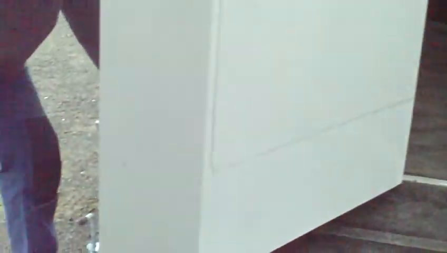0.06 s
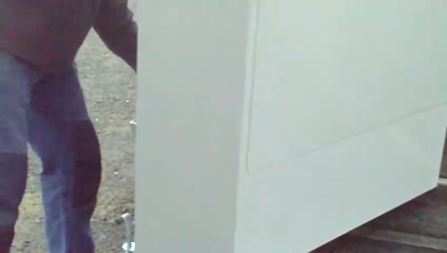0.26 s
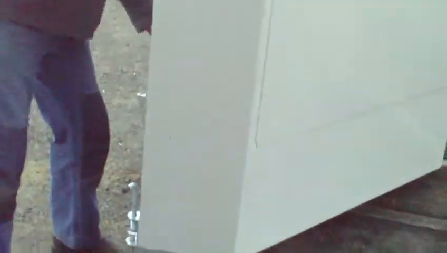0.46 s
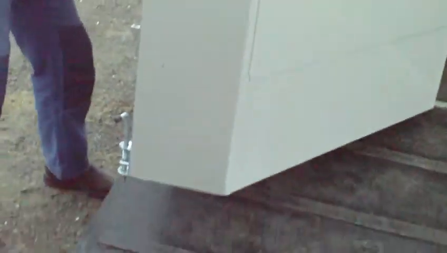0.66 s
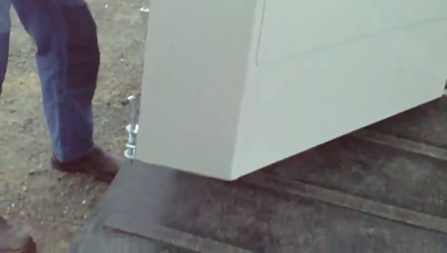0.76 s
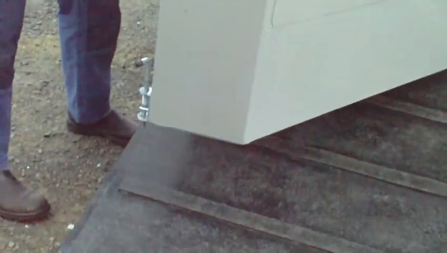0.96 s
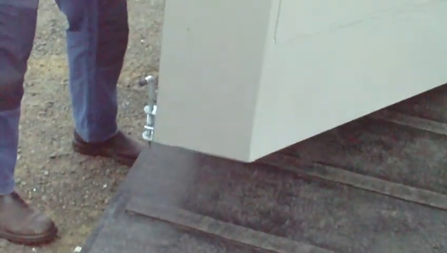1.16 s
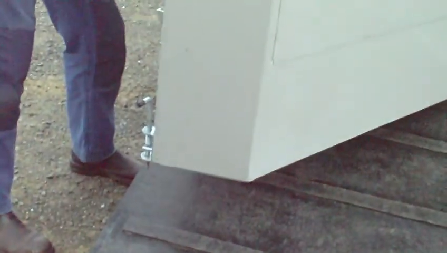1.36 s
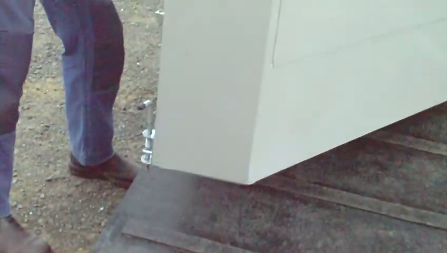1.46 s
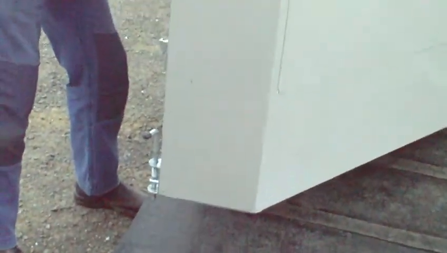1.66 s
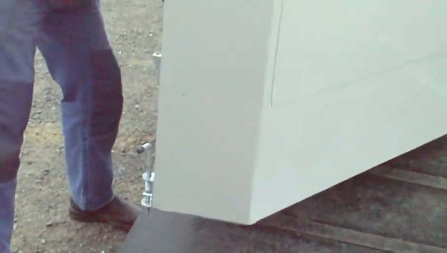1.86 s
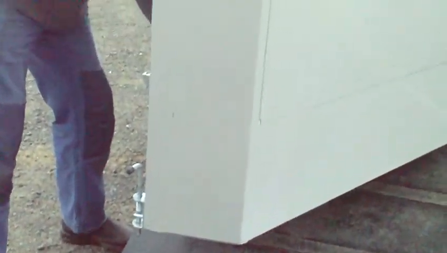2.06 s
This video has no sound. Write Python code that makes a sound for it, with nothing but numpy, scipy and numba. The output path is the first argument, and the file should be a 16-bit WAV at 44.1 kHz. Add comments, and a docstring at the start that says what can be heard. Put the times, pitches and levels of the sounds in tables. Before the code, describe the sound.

A trailer door's steel latch bangs open and rings, followed by softer knocks and scraping.

```python
"""A quiet yard, at a horse trailer. The door's steel latch snaps open, and the impact excites the modes
of the hollow door and the sheet-metal shell. The swinging door hums as it flexes, scrapes by stick-slip
friction, knocks a few times and brushes over the ramp. Grit crackles under boots and a small bird
whistles. Automatic gain control compresses the bang into a short plateau."""
import sys
import numpy as np
from scipy import signal
from scipy.fft import rfft, irfft
from scipy.io import wavfile
from numba import njit

SR = 44100
rng = np.random.default_rng(int(sys.argv[2]) if len(sys.argv) > 2 else 0)


def bounce(signal):
    """Save signal as a 16-bit WAV file at the path given by the first command-line argument."""
    frames = np.transpose(np.atleast_2d(signal))
    limited = np.clip(frames, -1, 1)
    pcm = np.round(limited * 32767).astype(np.int16)
    wavfile.write(sys.argv[1], SR, pcm)


N = 92610
TIME = np.arange(N) / SR
FREQS = np.maximum(np.arange(N // 2 + 1) * SR / N, 1)


def undb(db):
    """Amplitude ratio of a level in decibels."""
    return 10 ** (np.asarray(db) / 20)

def on_log(points):
    """Spectrum interpolated between (f, value) points on a logarithmic frequency axis."""
    hz, values = np.array(points).T
    return np.interp(np.log(FREQS), np.log(hz), values)

def filtered(source, gain):
    """Source-filter principle: spectrum times frequency response, normalised to rms 1."""
    out = irfft(rfft(source) * gain, N)
    return out / np.sqrt(np.mean(out ** 2))

def noise(gain):
    """Spectrally shaped Gaussian noise of rms 1."""
    return filtered(rng.standard_normal(N), gain)

def resonance(hz, width):
    """Band-pass response of a damped oscillator."""
    return 1 / (1 + 1j * hz / width * (FREQS / hz - hz / FREQS))

def fade(start, rise, t60):
    """Exponential damping with a linear onset."""
    age = np.maximum(TIME - start, 0)
    return np.minimum(age / max(rise, 1 / SR), 1) * np.exp(-np.log(1000) * age / t60)

def modes(table, start, rise, tilt_db, pivot_hz):
    """Modal superposition: damped sinusoids, tilted by tilt_db per octave about a pivot."""
    out = 0
    for hz, db, t60 in table:
        partial = np.sin(2 * np.pi * (hz * (TIME - start) + rng.random()))
        out += undb(db + tilt_db * np.log2(hz / pivot_hz)) * partial * fade(start, rise, t60)
    return out / 2

def slips(per_s, scatter_db):
    """Stick-slip as a Poisson process: tiny impulses of log-normal size."""
    occurs = rng.random(N) < per_s / SR
    return occurs * undb(scatter_db * rng.standard_normal(N)) * rng.choice([-1, 1], N)

# Decay of the trailer's shell: f/Hz, T60/s
SHELL_DECAY = [(150, 2.03), (350, 1.55), (750, 0.74), (2500, 0.68), (6000, 0.58), (10000, 0.52),
               (14000, 0.18)]

def shell(colour, start, rise, tilt_db, t60_scale, swell_cycles=0, patchy_db=2.5):
    """High modal density: sheet metal rings as uneven noise whose high bands die first."""
    grid = np.arange(0, SR / 2, 22)
    uneven = np.interp(FREQS, grid, rng.standard_normal(len(grid))) * np.minimum(FREQS / 2000, 1)
    octaves = np.log2(np.maximum(FREQS, 600))
    spectrum = rfft(noise(undb(on_log(colour) + tilt_db * octaves + patchy_db * uneven)))
    centres, t60s = np.array(SHELL_DECAY).T
    out = 0
    for hz, t60, weights in zip(centres, t60s, np.eye(len(centres))):
        band = irfft(spectrum * np.interp(np.log(FREQS), np.log(centres), weights), N)
        out += band * fade(start, rise + swell_cycles / hz, t60 * t60_scale)
    return out

# Modes of the door panel: f/Hz, relative level/dB, T60/s
PANEL_MODES = [(151.2, -30.5, 3.44), (286, -13, 1.7), (351, -7, 1.28), (439, -3, 0.72), (665.5, -0.5, 0.71),
               (802, 1.5, 0.72), (856, 2, 0.61), (933, 7, 0.54), (1300, -4.5, 0.62), (1702, -9, 0.6)]

def panel(start, rise, tilt_db=0, pivot_hz=990):
    """Free vibration: the struck door rings at its natural frequencies."""
    return modes(PANEL_MODES, start, rise, tilt_db, pivot_hz)

# Spectrum of a knock: f/Hz, relative level/dB
KNOCK_SPECTRUM = [(50, -73), (120, -36.5), (400, -21), (620, -8.5), (850, -3.5), (1090, -13.5), (1500, -7),
                  (2100, -1.5), (2430, -12.5), (3400, -6.5), (4100, -12.5), (7500, -12), (11000, -20.5),
                  (15000, -38)]
# Blows on the door: t/s, shell level/dB, rise/s, shell tilt/(dB/octave), panel gain/dB
DOOR_KNOCKS = [(-.01, -32.5, .003, -16.5, -66), (0.987, -28.5, 0.0045, -2.5, -36),
               (1.083, -23, 0.0023, -0.5, -57), (1.099, -21, 0.0011, -5, -30.5),
               (1.263, -33, 0.0014, -3.5, -44.5), (1.349, -33.5, 0.0026, -6, -41),
               (1.611, -47, 0.0044, -10, -71)]

def knocks():
    """Impulse excitation: light blows on the door ring both shell and panel."""
    out = 0
    for start, db, rise, tilt_db, panel_db in DOOR_KNOCKS:
        out += undb(db) * shell(KNOCK_SPECTRUM, start, rise, tilt_db, t60_scale=0.64)
        out += undb(panel_db) * panel(start, rise, tilt_db=2)
    return out

# Spectrum of the yard's background: f/Hz, relative level/dB
YARD_SPECTRUM = [(100, -17), (150, -7), (350, 8.5), (2500, 4.5), (4000, -3.5), (15000, -10)]

def yard(db=-52):
    """Stationary noise: a faint, broad hush."""
    return undb(db) * noise(undb(on_log(YARD_SPECTRUM)))

def grit(db=-57, hz=4000, end_s=1.37, fade_s=0.5):
    """Granular friction: grit crackles under boots until the door has swung out."""
    grains = filtered(slips(per_s=500, scatter_db=3.1), resonance(hz, 2 * hz) ** 2)
    return undb(db) * grains * np.clip((end_s - TIME) / fade_s, 0, 1)

# Ticks of the fittings: t/s, level/dB, centre f/Hz, T60/s
FITTING_TICKS = [(0.1301, -22, 3300, 0.01), (.672, -46.5, 6960, 0.16), (0.732, -44, 4170, 0.21),
                 (1.611, -38, 3820, 0.066)]

def ticks(bracket_hz=1750, bracket_db=-4, bracket_t60=0.012):
    """Brief contact has a broad spectrum: each fitting clicks and rings its bracket's damped mode."""
    out = 0
    for start, db, hz, t60 in FITTING_TICKS:
        click = noise(resonance(hz, 2 * hz) ** 2) * fade(start, 0.0001, t60)
        bracket = 2 * modes([(bracket_hz, bracket_db, bracket_t60)], start, 0.00004, 0, bracket_hz)
        out += undb(db) * (click + bracket)
    return out

# Modes of the steel latch: f/Hz, relative level/dB, T60/s
LATCH_MODES = [(1276, 6, 0.018), (2105, -1, 0.04), (2610, 7, 0.011), (4540, -2, 0.0526),
               (5410, -3.5, 0.052)]
# Slip, strike and later clank: t/s, level/dB, chatter time constant/s, tilt/(dB/octave), zing gain/dB
LATCH_IMPACTS = [(0.2023, -14.5, 0.016, 2.5, -4.5), (0.2124, 1, .004, -2, 0), (1.099, -15, 0.007, -8, -31)]

def latch(crack_db=-6, crack_hz=4500):
    """Steel-on-steel impact: chattering contact cracks, the latch rings, its clustered top modes zing."""
    out = 0
    for start, db, chatter, tilt_db, zing_db in LATCH_IMPACTS:
        rise = 0.28 * chatter
        crack = noise(resonance(crack_hz, 2 * crack_hz) ** 2) * fade(start, rise, np.log(1000) * chatter)
        zing = noise(resonance(hz=10200, width=1700) ** 2) * fade(start, rise=0.01, t60=0.17)
        ring = modes(LATCH_MODES, start, rise, tilt_db, pivot_hz=4850) / 2
        out += undb(db) * (ring + undb(crack_db) * crack + undb(zing_db) * zing)
    return out

# Spectrum of the bang: f/Hz, relative level/dB
BANG_SPECTRUM = [(50, -46.5), (120, -40), (240, -24), (340, -13.5), (520, -15), (800, 2.5), (1050, -8.5),
                 (1300, -6), (2030, -5.5), (2340, -14.5), (2800, -8), (4300, -14.5), (7400, -8),
                 (10300, -9.5), (12000, -15)]

def bang(start=0.2125, shell_db=-2, panel_gain_db=-11):
    """Structural coupling: the freed latch shakes door and shell, whose low modes build up slowest."""
    boom = shell(BANG_SPECTRUM, start, rise=0.013, tilt_db=0, t60_scale=0.98, swell_cycles=13)
    return undb(shell_db) * boom + undb(panel_gain_db) * panel(start, rise=0.084)

# Flexes of the swinging panel: t/s, level/dB
PANEL_FLEXES = [(.32, -25.5), (.6, -32), (.85, -40.5)]

def flexing(waver=0.35, waver_hz=14, drift_hz=4):
    """Amplitude and frequency modulation: each flex swells a wavering hum at the panel's drum mode."""
    drum_hz = PANEL_MODES[2][0]
    swell = sum(undb(db) * fade(start, rise=0.055, t60=0.69) for start, db in PANEL_FLEXES)
    pulse, drift = (noise(resonance(waver_hz, 2 * waver_hz) ** 2) for _ in range(2))
    hum = np.sin(2 * np.pi * np.cumsum(drum_hz + drift_hz * drift) / SR)
    return swell * (1 + waver * pulse) * hum

# Bird notes: t/s, duration/s, start f/Hz, end f/Hz, level/dB
BIRD_NOTES = [(0.668, 0.067, 4180, 4500, -45), (.84, 0.09, 4120, 4090, -55.5),
              (0.956, 0.021, 6180, 7200, -52.5), (1.378, 0.055, 4160, 3810, -55),
              (1.45, 0.09, 4000, 4520, -48), (1.519, 0.0174, 4310, 5170, -46),
              (1.55, 0.067, 4510, 4720, -57), (1.83, 0.025, 6030, 6400, -57),
              (1.893, 0.023, 5320, 6500, -56)]

def bird(waver=0.018, echo_db=-6):
    """Frequency glides: thin whistles, prolonged by the yard's reverberation."""
    song = 0
    for start, length, start_hz, end_hz, db in BIRD_NOTES:
        progress = np.clip((TIME - start) / length, 0, 1)
        glide = start_hz + (end_hz - start_hz) * progress ** 2
        hz = glide * (1 + waver * noise(resonance(hz=130, width=200)))
        arch = np.sqrt(4 * progress * (1 - progress))
        song += undb(db) * arch * np.sin(2 * np.pi * np.cumsum(hz) / SR)
    echo = rng.standard_normal(N) * fade(0, rise=0.0071, t60=0.94)
    return song + undb(echo_db) * signal.fftconvolve(song, echo / np.linalg.norm(echo))[:N]

# Resonances of the scraping edge: f/Hz, width/Hz, relative level/dB, rise/s
EDGE_RESONANCES = [(687, 65, -6, 0.025), (1892, 68, 1.5, 0.02), (2740, 1400, -4.5, 0.0078),
                   (5720, 1900, -0.5, 0.06), (7440, 210, -4.5, 0.05), (10000, 2100, 0, 0.05)]

def scrape(start=0.988, end=1.099, level_db=-34, release_s=0.022):
    """Stick-slip friction drives a metal edge; its high resonances build up later than the low ones."""
    drive = slips(per_s=1600, scatter_db=0.76)
    rings = 0
    for hz, width, db, rise in EDGE_RESONANCES:
        onset = np.clip((TIME - start) / rise, 0, 1)
        rings += undb(db) * filtered(drive, resonance(hz, width) ** 2) * onset
    release = np.exp(-np.maximum(TIME - end, 0) / release_s)
    return undb(level_db) * rings * release

# Resonances of the door on the ramp: f/Hz, width/Hz, relative level/dB
RAMP_RESONANCES = [(536, 1300, -11.5), (1600, 320, -3.5), (2285, 480, 4.5), (2540, 53, -2.5)]
# Envelope set by contact pressure: t/s, gain/dB
BRUSH_ENVELOPE = [(1.352, -80.5), (1.499, -59), (1.65, -52.5), (1.74, -58), (1.911, -56), (2.1, -73)]

def brush():
    """Sliding friction: the door's lower edge crosses the ramp with a fine, grainy hiss."""
    drive = slips(per_s=2500, scatter_db=3.7)
    rings = sum(undb(db) * filtered(drive, resonance(hz, width) ** 2) for hz, width, db in RAMP_RESONANCES)
    return rings * undb(np.interp(TIME, *np.array(BRUSH_ENVELOPE).T))

# Stereo balance: f/Hz, left minus right level/dB
BALANCE = [(130, 4), (8000, 2.5), (13000, 0.1)]

def scene(spread_db=-22, spread_hz=2500):
    """Interaural level difference sets the sum a little to the left; dull reflections widen it."""
    door = knocks() + ticks() + latch() + bang() + flexing() + scrape() + brush()
    direct = rfft(door + yard() + grit() + bird())
    reflections = rng.standard_normal(N) * fade(0, rise=0.002, t60=0.08)
    reflections /= np.linalg.norm(reflections)
    side = undb(spread_db) * rfft(reflections) / np.hypot(1, FREQS / spread_hz)
    balance = on_log(BALANCE)
    return np.array([irfft(direct * (1 + way * side) * undb(way * balance / 2), N) for way in (1, -1)])

@njit
def follow(x, attack_s, release_s):
    """First-order lag with separate time constants for rise and fall."""
    out, level = np.empty(len(x)), 0.
    for i in range(len(x)):
        level += (x[i] - level) / (SR * (attack_s if x[i] > level else release_s))
        out[i] = level
    return out

def record(dry, threshold_db=-18, ratio=9.7, sense_s=0.00083, low_hz=180, top_hz=15350):
    """Dynamic compression: gain drops just after a loud onset, overshoot clips, bass and top are cut."""
    power = follow(dry.mean(axis=0) ** 2, sense_s, sense_s)
    excess_db = np.maximum(10 * np.log10(power + 1e-12) - threshold_db, 0)
    reduction_db = follow(excess_db * (1 - 1 / ratio), attack_s=0.0067, release_s=0.018)
    clipped = np.clip(dry * undb(-reduction_db), -1, 1)
    high_pass = signal.butter(1, low_hz, "high", fs=SR, output="sos")
    low_pass = signal.ellip(10, .2, 70, top_hz, fs=SR, output="sos")
    return signal.sosfilt(low_pass, signal.sosfilt(high_pass, clipped))


dry = scene()
out = record(dry)
bounce(out)
```